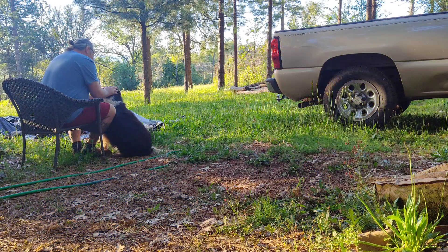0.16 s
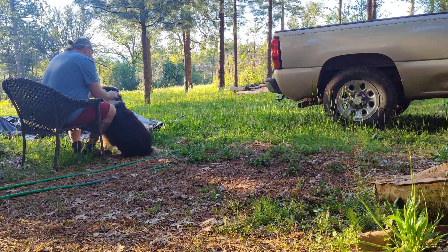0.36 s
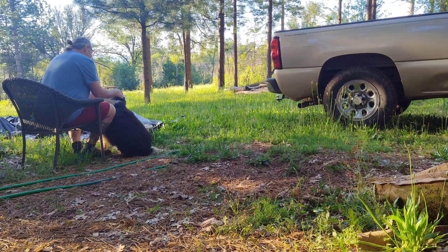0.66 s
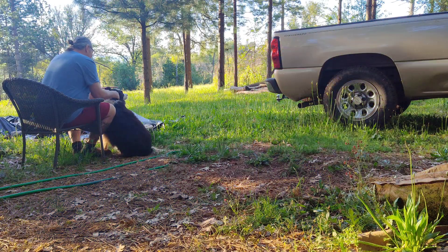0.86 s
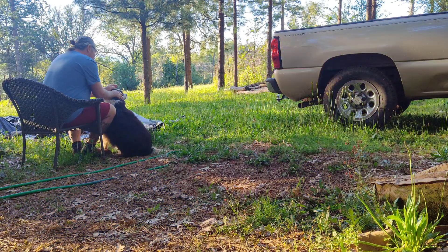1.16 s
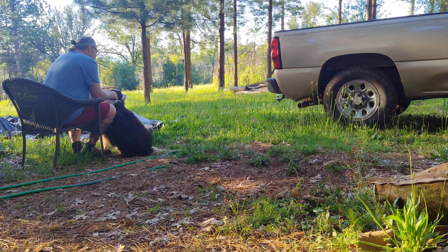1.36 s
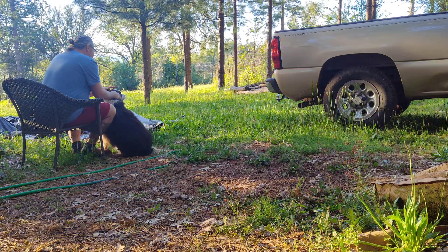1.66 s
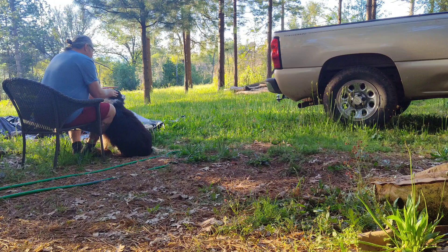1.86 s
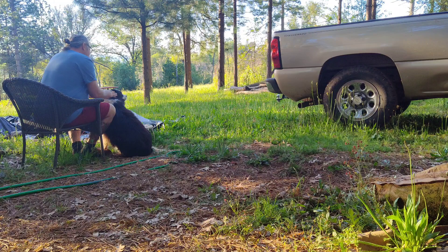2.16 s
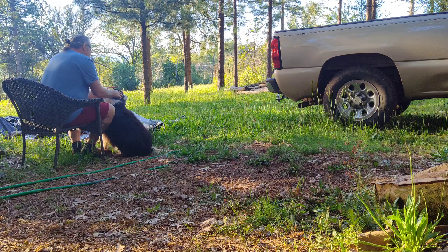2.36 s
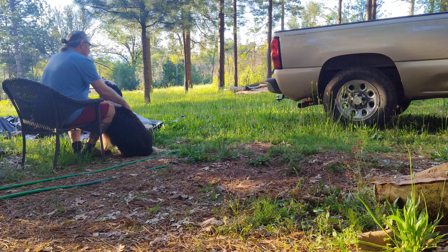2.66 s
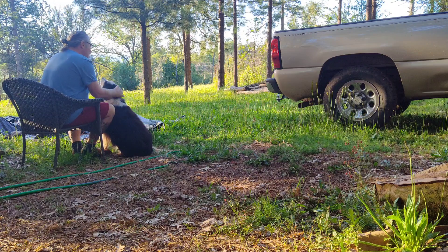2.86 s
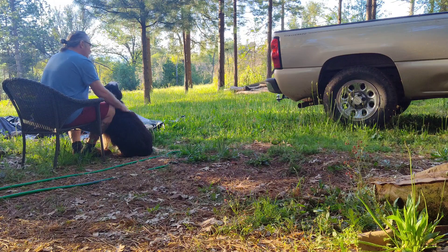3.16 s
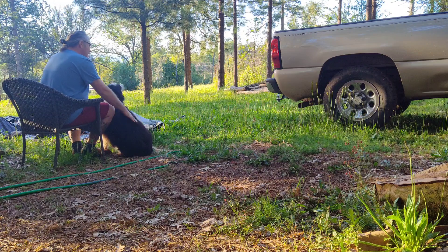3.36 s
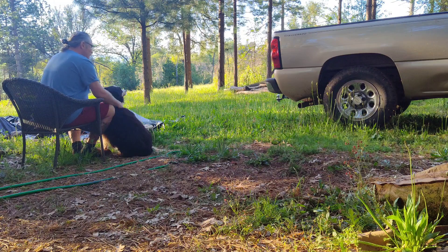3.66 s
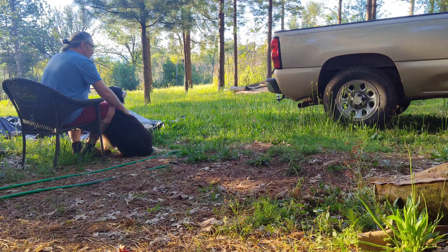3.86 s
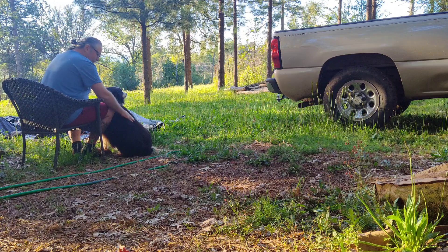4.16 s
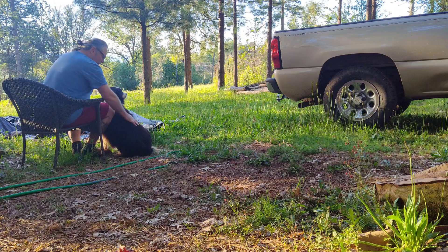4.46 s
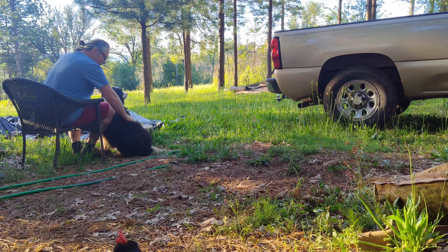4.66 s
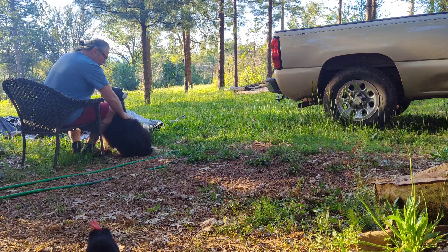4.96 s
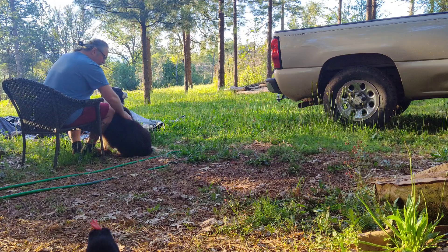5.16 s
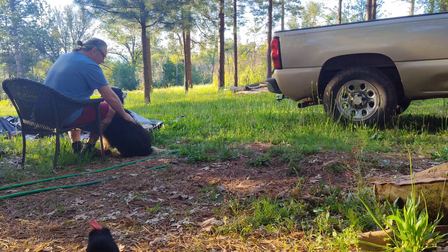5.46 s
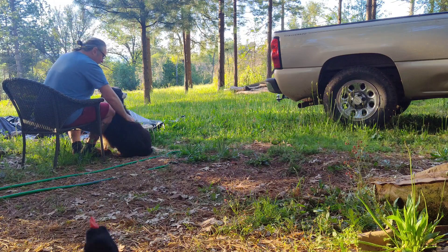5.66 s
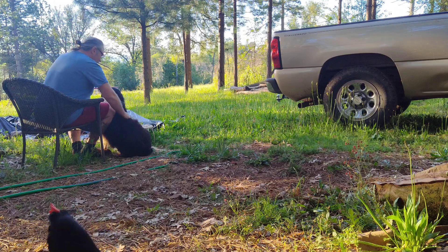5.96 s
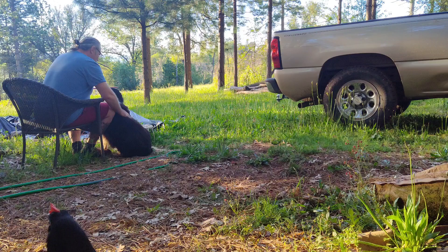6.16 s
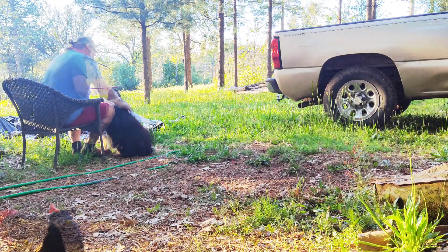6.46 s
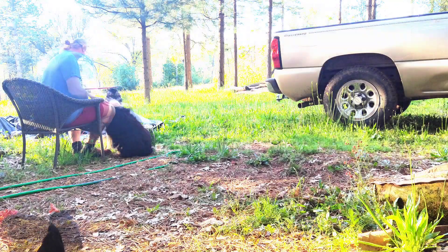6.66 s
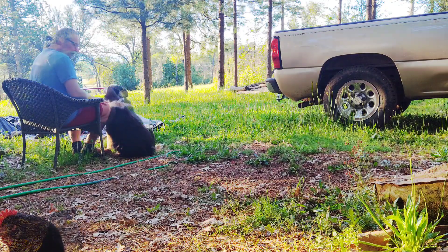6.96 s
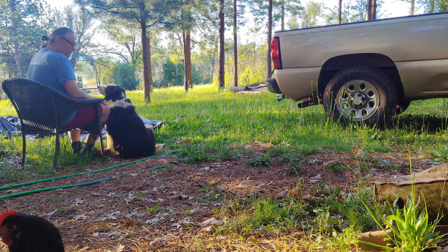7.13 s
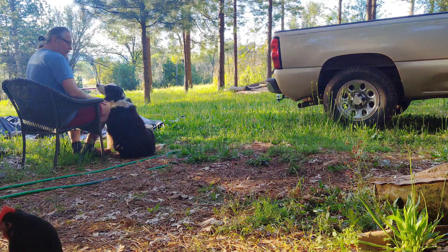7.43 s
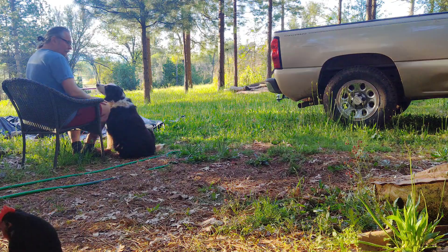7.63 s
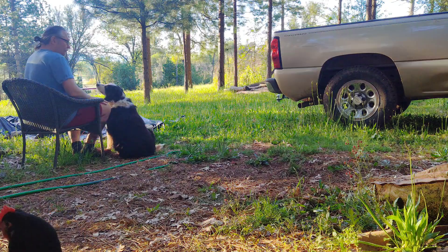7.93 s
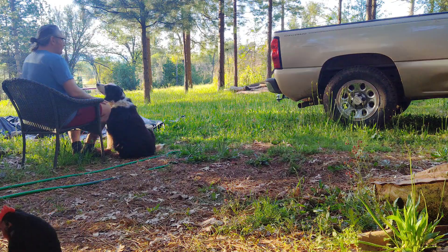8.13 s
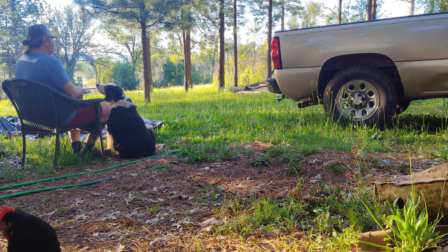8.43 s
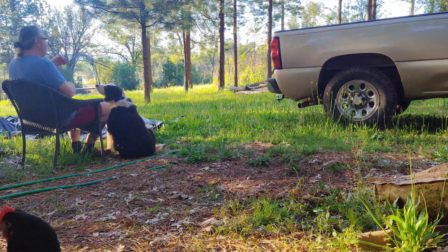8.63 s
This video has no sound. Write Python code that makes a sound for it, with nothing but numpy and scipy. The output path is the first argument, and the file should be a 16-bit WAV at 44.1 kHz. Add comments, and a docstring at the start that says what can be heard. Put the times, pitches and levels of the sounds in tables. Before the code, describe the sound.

In a quiet yard among pines, a low rumble and soft hiss lie under faint, echoing bird chirps. Twigs tick and a songbird gives thin high calls and a trill. A hen close to the microphone clucks softly four times, then draws out a call that swells from a pure note into a rasp and stops short. Faint falling whistles, a brief soft rustle and a distant trill follow.

```python
"""A quiet yard: low rumble, soft hiss, distant chirps echoing in the pines. Twigs tick, a songbird gives
a thin buzzy call, another trills. At 2.6 s a close hen clucks softly four times, then draws out a call
that swells from a pure note into a rasp: membrane pulses in her syrinx ring the throat and turn uneven
and chaotic under pressure. From 4.8 s come falling slurs, a seesaw song and a second of rustling;
a faint, distant trill ends the scene."""
import sys
import numpy as np
from scipy import signal
from scipy.fft import rfft, irfft, next_fast_len
from scipy.io import wavfile
from scipy.ndimage import map_coordinates

SR = 44100
rng = np.random.default_rng(int(sys.argv[2]) if len(sys.argv) > 2 else 0)


def materialize(psi):
    """Save the field psi as 16-bit PCM at rate SR to the path in sys.argv[1].

    A 1-D psi becomes a single channel; in a 2-D psi each row is a channel.
    """
    bounded = np.clip(np.atleast_2d(psi).T, -1, 1)
    quanta = np.round(bounded * 32767).astype(np.int16)
    wavfile.write(sys.argv[1], SR, quanta)


N = 387638
TIME = np.arange(N) / SR
BAND_LIMIT_HZ = 15550


def amp(db):
    """dB to gain."""
    return 10 ** (np.asarray(db) / 20)


def unit(x):
    """Scale to rms 1."""
    return x / np.sqrt(np.mean(x ** 2) + 1e-20)


def at_hz(points, hz):
    """Interpolate a table over log frequency."""
    f, value = np.transpose(points)
    return np.interp(np.log(hz + 1), np.log(f + 1), value)


def at_time(points, t):
    """Interpolate a table over time."""
    return np.interp(t, *np.transpose(points))


def add(mix, s, sound):
    """Mix in a sound at time s."""
    part = mix[:, round(s * SR):][:, :sound.shape[1]]
    part += sound[:, :part.shape[1]]


def pan(side_db):
    """Stereo gains; side_db is left minus right."""
    return amp([[side_db / 2], [-side_db / 2]])


def colour(x, points):
    """Filter by rows of f/Hz, level/dB."""
    size = next_fast_len(x.shape[-1])
    gain = amp(at_hz(points, np.fft.rfftfreq(size, 1 / SR)))
    return irfft(rfft(x, size) * gain, size)[..., :x.shape[-1]]


def wander(t, per_s):
    """Smooth random curve, rms about 1."""
    return map_coordinates(rng.standard_normal(2000), [(t - t[0]) * per_s], order=3, mode="wrap")


def bump(x, centre, width):
    """Rounded peak of height 1; width at half height."""
    return 2. ** -(abs(2 * (x - centre) / width) ** np.pi)


# Air spectrum: f/Hz, level/dB (relative)
AIR_SPECTRUM = [(28, 3.5), (50, -2), (81, -6.5), (156, -9), (187, -14.5), (350, -16), (520, -21),
                (1510, -27.5), (3490, -26.3), (15500, -33.5)]
# Left-right correlation: f/Hz, correlation/1
AIR_CORRELATION = [(30, 0.47), (130, 0.46), (700, 0.0098)]
# Left-right balance: f/Hz, side/dB
AIR_BALANCE = [(150, -2.5), (2400, 2), (6000, -13), (12000, 1)]

def air(level_db=-60):
    """Outdoor rumble and soft hiss, partly correlated between channels."""
    size = next_fast_len(N)
    hz = np.fft.rfftfreq(size, 1 / SR)
    left, independent = rfft(rng.standard_normal((2, size)))
    correlation = at_hz(AIR_CORRELATION, hz)
    right = correlation * left + np.sqrt(1 - correlation ** 2) * independent
    side = amp(at_hz(AIR_BALANCE, hz) / 2)
    spectrum = np.array([left * side, right / side]) * amp(at_hz(AIR_SPECTRUM, hz))
    return unit(irfft(spectrum, size)[:, :N]) * amp(level_db)


# Rustle spectrum: f/Hz, level/dB (relative)
RUSTLE_SPECTRUM = [(60, 20), (500, 0.5), (6000, -0.5), (12000, -9)]
# Rustle envelope: t/s, level/dB
RUSTLE_ENVELOPE = [(6.1, -82), (6.24, -62.5), (7.15, -63.5), (7.27, -82)]

def rustle(grain_db=2):
    """A second of soft, grainy rubbing over a faint floor."""
    level_db = at_time(RUSTLE_ENVELOPE, TIME) + grain_db * wander(TIME, 90)
    return unit(colour(rng.standard_normal((2, N)), RUSTLE_SPECTRUM)) * amp(level_db)


# Echo decay: f/Hz, T60/s
ECHO_T60 = [(300, 0.14), (5000, 1), (7500, 0.59), (14000, 0.017)]

def woods(x, echoes_per_s=2000):
    """Sparse echoes off trunks and ground; each band decays at its own rate."""
    taps = rng.standard_normal((2, SR)) * (rng.random((2, SR)) < echoes_per_s / SR)
    taps[:, :200] = 0  # 4.5 ms pre-delay
    hz, t, bands = signal.stft(taps, SR, nperseg=256)
    decay = amp(-60 * t / at_hz(ECHO_T60, hz)[:, None])
    tail = signal.istft(bands * decay, SR, nperseg=256)[1]
    tail /= np.linalg.norm(tail, axis=1, keepdims=True)
    return signal.fftconvolve(x, tail, axes=1)[:, :N]


def whistle(t, hz, db, taper=0.51):
    """A bird's pure tone along a pitch curve."""
    tone = np.sin(2 * np.pi * np.cumsum(hz) / SR)
    return amp(db) * unit(tone * signal.windows.tukey(len(t), taper))


def note(length_s, start_hz, end_hz, db, buzz_hz):
    """Whistled glide with fast random FM of depth buzz_hz."""
    t = np.arange(0, length_s, 1 / SR)
    return whistle(t, np.geomspace(start_hz, end_hz, len(t)) + buzz_hz * wander(t, 400.3), db)


def far_chirps(source_db=-81, direct_db=-4, high_hz=7100, low_hz=4000, count=800):
    """Blur of chirps deep in the trees, mostly echo, thinning with time."""
    out = np.zeros((2, N))
    for when, length, pitch, glide, distance, side in rng.random((count, 6)):
        hz = high_hz * (low_hz / high_hz) ** (pitch ** 1.5)
        length_s = 0.0141 + 0.0379 * length ** 2
        chirp = note(length_s, hz, hz * (0.87 + .3 * glide), source_db - 8 * distance, buzz_hz=300)
        add(out, TIME[-1] * when ** 1.15, pan(20 * side - 12) * chirp)
    return amp(direct_db) * out + woods(out)


# Distant calls: t/s, f/Hz
DISTANT_CALLS = [(4.44, 2420), (5.769, 3300), (6.48, 2120), (6.661, 3180), (7.25, 3100)]

def far_calls(call_db=-75, trill_start_s=8.22, trill_hz=3700, trill_db=-83, step_s=.052, fall=.95):
    """Short low calls and one even trill from distant birds, blurred by the trees."""
    out = np.zeros((2, N))
    for s, hz in DISTANT_CALLS:
        add(out, s, note(.046, hz, hz * fall, call_db, buzz_hz=130)[None])
    for k in range(11):
        chip = note(.035, trill_hz, trill_hz * fall, trill_db, buzz_hz=130)
        add(out, trill_start_s + k * step_s, chip[None])
    return out + .5 * woods(out)


def seesaw_song(start_s=5.553, step_s=.268, buzz_s=.135, whistle_s=.085, swell_db=2.5):
    """Three level-pitched buzzes, each louder, with higher whistles between."""
    out = np.zeros((2, N))
    lead_s = (step_s - buzz_s + whistle_s) / 2
    for k in range(3):
        s = start_s + k * step_s
        add(out, s, pan(32.2) * note(buzz_s, 4760, 4720, db=-82 + swell_db * k, buzz_hz=160))
        if k:
            add(out, s - lead_s, pan(22) * note(whistle_s, 5280, 5230, db=-77, buzz_hz=52))
    return out


# Single bird notes: t/s, length/s, start f/Hz, end f/Hz, level/dB, buzz depth/Hz, side/dB
BIRD_NOTES = [(0.22, 0.22, 5750, 4080, -84, 18, 6), (1.267, 0.23, 621, 580, -80, 8.7, -3),
              (2.635, 0.022, 4870, 5450, -69.5, 200, 14), (2.952, 0.021, 5630, 4940, -68.5, 170, 8),
              (3.07, .13, 5630, 6400, -72.5, 450, 2), (6.18, 0.078, 5930, 5960, -67, 60, -13),
              (6.263, 0.042, 6000, 6940, -64.5, 500, -19.5), (6.559, 0.086, 4230, 4020, -72.5, 50, 19)]

def single_notes():
    """Scattered glides from birds on both sides."""
    out = np.zeros((2, N))
    for s, *shape, side_db in BIRD_NOTES:
        add(out, s, pan(side_db) * note(*shape))
    return out


def slurs(start_s=4.778, step_s=.1215, quicken_s=.0008, peak_db=-62, ends_db=-6, left_db=-12):
    """Nine falling slurs that quicken slightly, swell and fade."""
    out = np.zeros((2, N))
    for k, place in enumerate(np.linspace(-1, 1, 9)):
        slur = note(0.036, 8100, 4950, peak_db + ends_db * place ** 2, buzz_hz=255)
        add(out, start_s + k * step_s - quicken_s * k ** 2, amp([[left_db], [0]]) * slur)
    return out


def trill(start_s=1.083, step_s=.0472, slowing_s=.00028, level_db=-62, fade_db=12, count=13):
    """Uneven run of falling chirps with higher lead-ins; slows and fades."""
    out = np.zeros((2, N))
    for k, (uneven_db, detune) in enumerate(rng.standard_normal((count, 2))):
        db = level_db - fade_db * (k / count) ** 4 + uneven_db
        shift_hz = 70 * detune
        lead_in = note(.014, 6900, 5900, db - 12, buzz_hz=200)
        chirp = note(.018, 5480 + shift_hz, 4680 + shift_hz, db, buzz_hz=70)
        add(out, start_s + k * step_s + slowing_s * k ** 2, pan(1) * np.concatenate([lead_in, chirp]))
    return out


# Thin songbird calls: t/s, length/s, settled f/Hz, opening slide/Hz, initial level/dB
SEET_CALLS = [(0.867, 0.17, 6890, 1474, -54), (2.475, 0.091, 7260, 305, -58.5),
              (6.686, 0.18, 6950, 978, -59)]

def seets(slide_s=0.013, flick_hz=650, waver_hz=110, fade_db=7, sizzle_db=-6, side_db=-13, taper=.3):
    """Each call slides onto a high pitch that keeps flicking upward, with a sizzle just above."""
    out = np.zeros((2, N))
    for s, length_s, hz, slide_hz, db in SEET_CALLS:
        t = np.arange(0, length_s, 1 / SR)
        flicks = np.clip(wander(t, 1300) / 2 + 0.111, 0, 1) ** 1.79
        lift_hz = np.maximum(slide_hz * np.exp(-t / slide_s), flick_hz * flicks)
        pitch_hz = hz + waver_hz * abs(wander(t, 130)) + lift_hz
        band = [(hz - 400, -45), (hz + 100, 0), (hz + 1400, -6), (hz + 2400, -30)]
        sizzle = unit(colour(rng.standard_normal(len(t)), band) * signal.windows.tukey(len(t), taper))
        level_db = db - fade_db * t / length_s
        call = whistle(t, pitch_hz, level_db, taper) + amp(level_db + sizzle_db) * sizzle
        add(out, s, pan(side_db) * call)
    return out


# Twig ticks: t/s, initial level/dB
TWIG_TICKS = [(0.787, -51), (0.7925, -47.5), (0.8266, -42), (1.483, -51)]

def twigs(decay_s=0.0022):
    """Dry ticks: very short, bright noise bursts."""
    out, t = np.zeros((2, N)), np.arange(1024) / SR
    band = [(500, -45), (4700, 14), (6800, 17.5), (10000, -10)]
    for s, db in TWIG_TICKS:
        crack = unit(colour(rng.standard_normal((2, len(t))), band))
        add(out, s, pan(-2) * amp(db) * crack * np.exp(-t / decay_s))
    return out


def ground_scatter(x, level_db=-9):
    """Leaf litter and a nearby stand scatter treble within milliseconds, differently per channel."""
    taps = rng.standard_normal((2, 400)) * (rng.random((2, 400)) < .15) * np.exp(-np.arange(400) / 150)
    taps[:, :25] = 0
    taps /= np.linalg.norm(taps, axis=1, keepdims=True)
    treble = colour(x, [(500, -18), (1100, -7), (2000, 0)])
    return amp(level_db) * signal.oaconvolve(treble, taps, axes=1)[:, :N]


def syrinx(t, hz, doubling, rough, hiss=.45, puff_s=0.00033):
    """Membrane pulses with air puffs; doubling weakens every second one, rough staggers them."""
    doubling, rough = np.clip([doubling, rough], 0, 1)
    waver = np.where(rough < .08, .022, .01) * wander(t, 130)  # wider on the soft note
    jitter = 0.091 * rough * wander(t, 260)
    turns = np.cumsum(hz * (1 + waver + jitter)) / SR
    surges, stagger = wander(t, 330), rng.standard_normal(len(t))
    cycle = np.round(turns).astype(int)
    alternate = (-1.) ** cycle
    strength = np.maximum(1 + doubling * alternate + 0.99 * rough * surges, 0)
    shift_turns = np.clip(0.14 * doubling * alternate + 0.094 * rough * stagger[cycle], -1 / 3, 1 / 3)
    from_closure_s = (turns - cycle - shift_turns) / hz
    pulses = np.sinc(BAND_LIMIT_HZ * from_closure_s) * np.cos(np.pi * (turns - cycle)) ** 2
    puffs = rng.standard_normal(len(t)) * np.exp(-abs(from_closure_s) / puff_s)
    breath = colour(strength * puffs, [(600, -16), (1800, 9)])
    return unit(strength * pulses) + hiss * unit(breath)


# Broad throat response: f/Hz, level/dB
THROAT_SHAPE = [(100, -71), (200, -26.5), (275, -12), (370, -10), (440, 0), (660, 2.5), (810, 1.5),
                (950, -14), (1280, -19), (1900, -25), (2300, -30.5), (3300, -24.5), (7300, -40.5),
                (8700, -27), (14000, -72)]
# Narrow resonances: f/Hz, width/Hz, level/dB
THROAT_FORMANTS = [(990, 70, 9), (1975, 110, 13), (2618, 190, 24.5), (4450, 850, 13), (5859, 600, 10.5),
                   (7200, 600, 18)]
# Neck stretch, moving all formants together: t/s, frequency ratio/1
NECK_STRETCH = [(3.45, 1.01), (3.69, 0.97), (3.95, 1.002), (4.33, 0.99)]
# Piercing nasal resonance: t/s, level/dB
NASAL_GAIN = [(3.3, -0.5), (3.73, 3), (3.88, -3.5), (3.94, 3), (4.16, -0.5), (4.33, -4)]
# Overtone gain from pressing: t/s, level/dB at 1100 Hz
PRESS_GAIN = [(2.65, -31), (3.05, -18.5), (3.43, -10), (3.65, -5.5), (3.87, -4.5), (4.29, -1.5), (4.32, 2),
              (4.36, -3.5)]

def throat(drive, t, tremble=0.007, nasal_hz=2620, nasal_width_hz=450):
    """Resonances shift and tremble with the neck; overtones open up as she presses."""
    hz, frame_s, bands = signal.stft(drive, SR, nperseg=1024, noverlap=896)
    scene_s = t[0] + frame_s
    neck = at_time(NECK_STRETCH, scene_s) * (1 + tremble * wander(frame_s, 35))
    formants_db = sum(db / (1 + (2 * (hz[:, None] - f * neck) / width) ** 2)
                      for f, width, db in THROAT_FORMANTS)
    nasal_db = np.outer(bump(hz, nasal_hz, nasal_width_hz), at_time(NASAL_GAIN, scene_s))
    shape_db = at_hz(THROAT_SHAPE, hz)[:, None] + formants_db + nasal_db
    # Minimum phase: resonances ring after each pulse.
    log_gain = np.log(amp(shape_db))
    phase = -signal.hilbert(np.concatenate([log_gain, log_gain[-2:0:-1]]), axis=0).imag[:len(hz)]
    press_weight = at_hz([(540, 0), (1100, 1), (2600, 1.75), (7000, 2.1)], hz)
    press_db = np.outer(press_weight, at_time(PRESS_GAIN, scene_s))
    response = amp(shape_db + press_db) * np.exp(1j * phase)
    return signal.istft(bands * response, SR, nperseg=1024, noverlap=896)[1][:len(t)]


# Shadowing of the left channel: f/Hz, level/dB
LEFT_SHADOW = [(1500, -.8), (2000, -3.5), (4400, 0), (6000, -10), (7300, -17), (14000, -2)]

def voice(t, db, hz, doubling, rough, left_lag_s=0.00014):
    """Syrinx through throat, held to rms level db; the left channel is duller and later."""
    sound = throat(syrinx(t, hz, doubling, rough), t)
    rms = np.sqrt(signal.convolve(sound ** 2, np.hanning(512) / 256, "same") + 1e-12)
    right = sound * amp(db) / rms
    left = map_coordinates(colour(right, LEFT_SHADOW), [np.arange(len(t)) - left_lag_s * SR], order=3)
    return np.array([left, right])


# Soft clucks: t/s, length/s, level/dB, settled f/Hz, opening drop/Hz, initial roughness/1
HEN_CLUCKS = [(2.622, 0.047, -41.5, 541, 69.5, 0.12), (2.661, 0.056, -45.5, 537, 205, 0.65),
              (2.705, 0.081, -44, 545, 130, 0.15), (2.857, 0.055, -44, 567, 407, 0.93)]

def clucks(attack_s=0.018, release_s=0.041, settle_s=0.0127):
    """Short bursts of strong-weak pulses that start high and rough, then settle."""
    out = np.zeros((2, N))
    for s, length_s, db, hz, drop_hz, rough in HEN_CLUCKS:
        t = np.arange(0, length_s, 1 / SR)
        unsettled = np.exp(-t / settle_s)
        ramp = np.clip(np.minimum(t / attack_s, (length_s - t) / release_s), 0, 1)
        level_db = db + 20 * np.log10(np.sin(np.pi / 2 * ramp) ** 2 + 0.072)
        pitch_hz = hz + drop_hz * unsettled
        doubling = np.ones(len(t))
        add(out, s, voice(s + t, level_db, pitch_hz, doubling, rough * np.sqrt(unsettled)))
    return out


# Slow pitch course: t/s, f/Hz
CALL_PITCH = [(3.39, 543), (3.447, 495), (3.465, 538), (3.495, 499), (3.527, 542), (3.565, 516),
              (3.686, 486.2), (3.735, 517.7), (3.835, 541), (4.36, 538.2)]
# Slow envelope: t/s, level/dB
CALL_ENVELOPE = [(2.92, -45.5), (3.0, -48), (3.064, -51), (3.245, -45.5), (3.27, -42), (3.392, -41.5),
                 (3.64, -37), (4.12, -36.5), (4.185, -35), (4.336, -35), (4.36, -40)]
# Breaks, syrinx slipping into chaos: t/s, added roughness/1, pitch jump/Hz
CHAOTIC_BREAKS = [(3.413, 0.28, -5.5), (3.532, 0.31, 3), (3.778, 0.49, -8), (3.89, 0.51, -19.5),
                  (3.932, 0.6, 5.5), (4.035, 0.65, 24.5), (4.129, 0.64, 45.5), (4.211, 0.38, -9.5),
                  (4.286, 0.42, 13.5)]
# Clear spells, syrinx locking into even pulses at a lower pitch: t/s, length/s
LOCKED_SPELLS = [(4.106, 0.031), (4.156, 0.018), (4.246, 0.0135), (4.321, .038)]

def long_call(start_s=2.897, rasp_s=3.4, end_s=4.372):
    """A pure, quavering note cracks, swells into a rasp with breaks and clear spells, stops short."""
    crack_s, crack_length_s, crack_hz, crack_db = 2.928, .027, 443, -17
    break_length_s, flutter_db, quaver_db = .032, 3.5, 3.5
    clear_drop_hz, clear_db = 47.94, 1.6
    lift_hz, lift_length_s = 35.6, 0.036
    doubling_max, doubling_rise_s = 0.66, 0.55
    attack_s, release_s = 0.00592, 0.0054

    t = np.arange(start_s, end_s, 1 / SR)
    crack = np.exp(-(2 * (t - crack_s) / crack_length_s) ** 2)
    chaos = sum(rough * bump(t, s, break_length_s) for s, rough, _ in CHAOTIC_BREAKS)
    jumps_hz = sum(jump_hz * bump(t, s, break_length_s) for s, _, jump_hz in CHAOTIC_BREAKS)
    clear = np.minimum(sum(bump(t, s, length_s) for s, length_s in LOCKED_SPELLS), 1)
    end_lift = bump(t, end_s - lift_length_s / 2, lift_length_s) * (1 - clear)
    hz = at_time(CALL_PITCH, t) + crack_hz * crack + jumps_hz - clear_drop_hz * clear + lift_hz * end_lift

    db = at_time(CALL_ENVELOPE, t)
    softness = np.clip((-36 - db) / 10, .15, 1)
    db += crack_db * crack + clear_db * clear
    db += quaver_db * softness * wander(t, 95)
    db += flutter_db * chaos * wander(t, 340)

    rasp = np.clip((t - rasp_s) / doubling_rise_s, 0, 1)
    doubling = doubling_max * rasp * (1 - clear) * (1 - 1.24 * chaos)
    rough = np.where(t < rasp_s, .07, .23) + chaos
    gate = np.clip(np.minimum((t - start_s) / attack_s, (t[-1] - t) / release_s), 0, 1) ** 2
    return gate * voice(t, db, hz, doubling, rough)


def hen(call_start_s=2.897):
    """Four clucks, then the long call, with ground scatter."""
    out = clucks()
    add(out, call_start_s, long_call(call_start_s))
    return out + ground_scatter(out)


def scene():
    """Hen near and dry; birds further off, echoing among the trees."""
    sources = [  # sound, echo send/dB
        (hen(), -34),
        (seets(), -4),
        (slurs() + single_notes() + seesaw_song() + trill(), -6),
        (twigs(), -12),
    ]
    direct = sum(sound for sound, _ in sources)
    echoes = woods(sum(amp(send_db) * sound for sound, send_db in sources))
    return direct + echoes + far_chirps() + far_calls() + air() + rustle()


def record(dry):
    """Steep low-pass at the band limit."""
    lowpass = signal.firwin(511, BAND_LIMIT_HZ, window=("kaiser", 9), fs=SR)
    return signal.oaconvolve(dry, lowpass[None], "same")


dry = scene()
out = record(dry)
materialize(out)
```